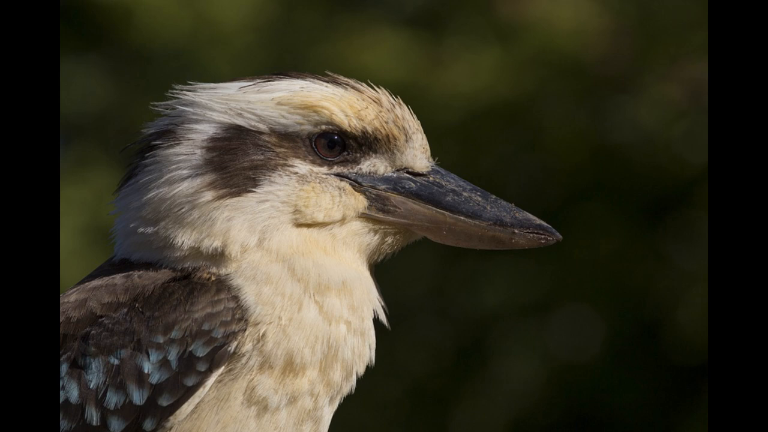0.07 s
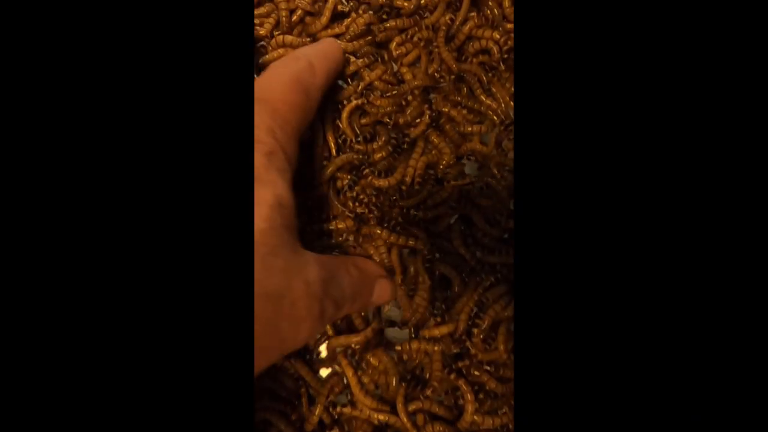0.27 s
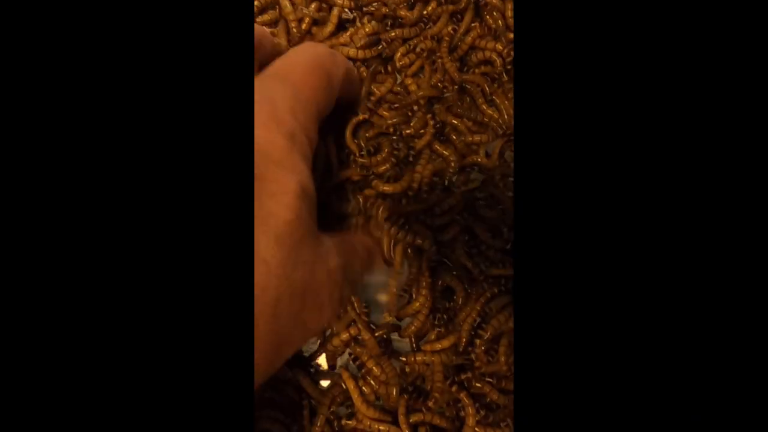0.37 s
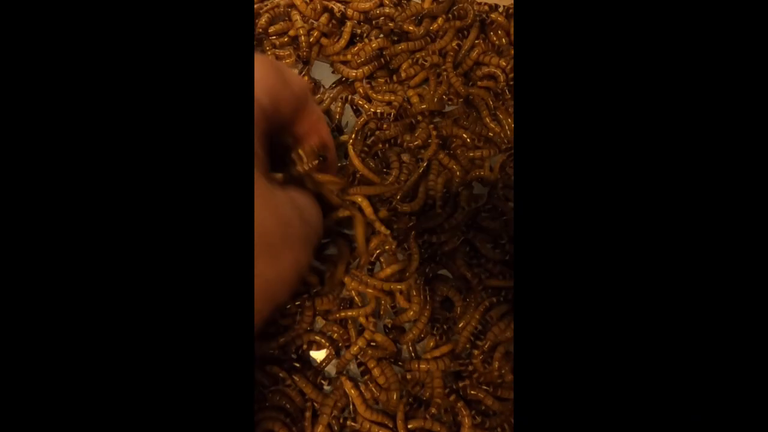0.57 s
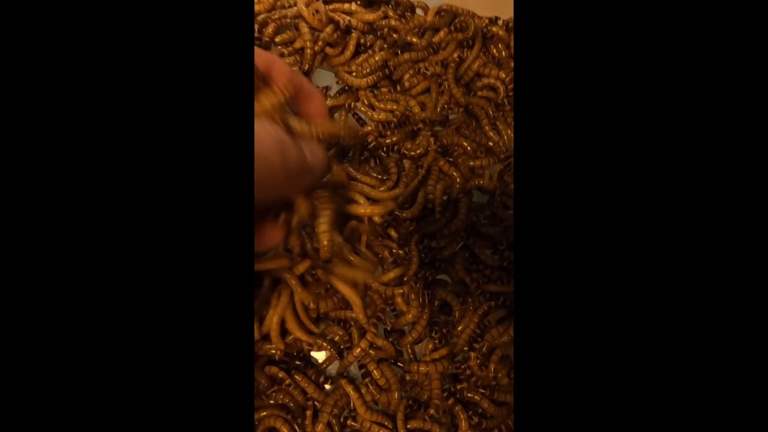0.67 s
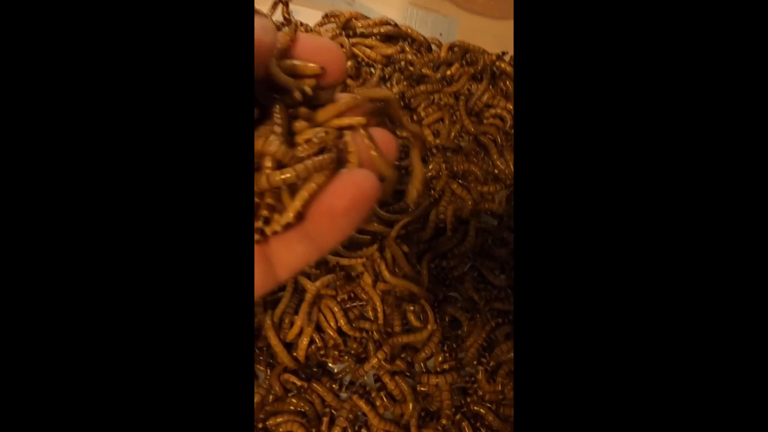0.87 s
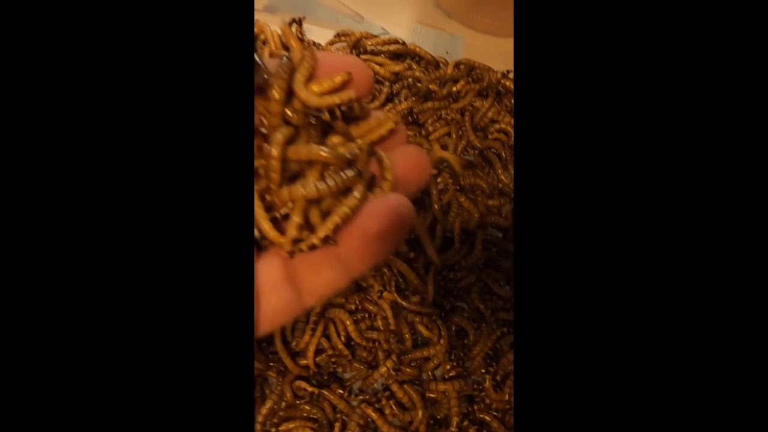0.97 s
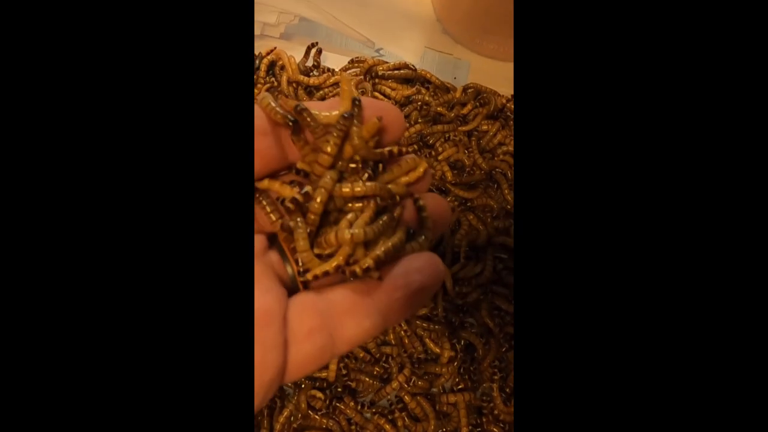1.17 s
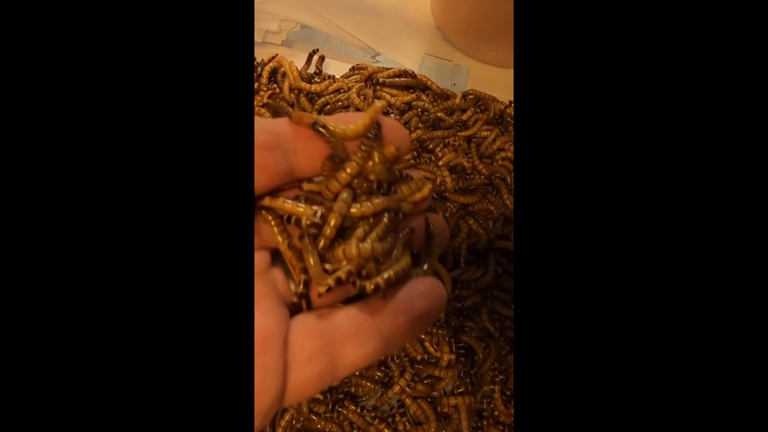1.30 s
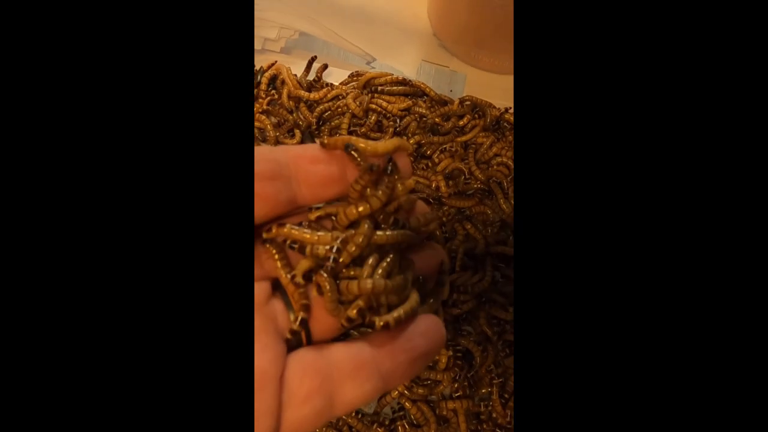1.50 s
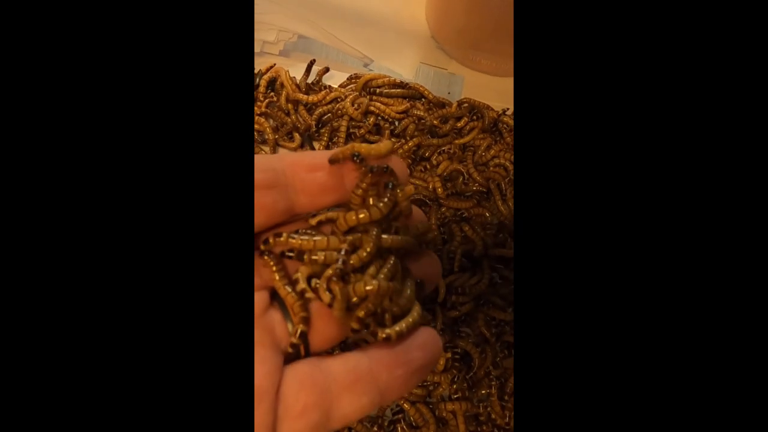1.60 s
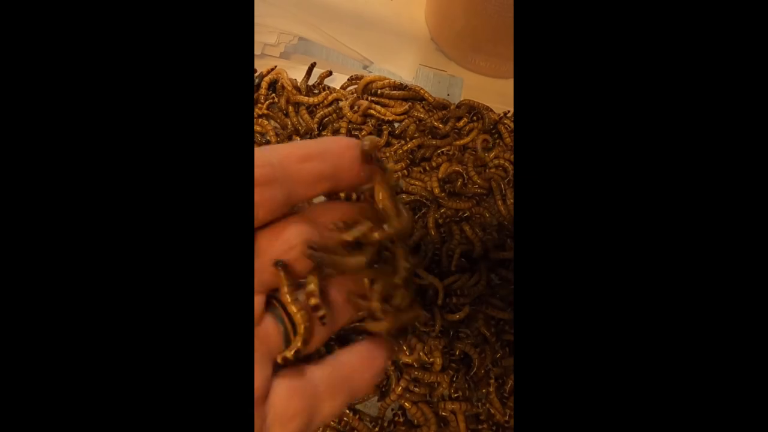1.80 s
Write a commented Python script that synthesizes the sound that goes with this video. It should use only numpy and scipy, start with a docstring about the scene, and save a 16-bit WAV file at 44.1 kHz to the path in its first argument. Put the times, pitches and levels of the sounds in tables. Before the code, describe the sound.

Mealworms rustle dryly as a hand digs into their plastic tub. Knuckles thud on the bottom, a handful trickles back with a soft hiss, and the wall snaps once. The close microphone rumbles over a low room drone.

```python
"""A dry rustle of mealworms as a hand digs into their plastic tub and lets a handful trickle back.
The bodies rub and collide in a mass of tiny clicks. Knuckles knock the loaded bottom, which thuds,
and the wall snaps once. The close hand-held microphone rumbles and is bumped, over a low room drone."""
import sys
import numpy as np
from scipy import signal
from scipy.fft import rfft, irfft, next_fast_len
from scipy.io import wavfile

SR = 44100
rng = np.random.default_rng(int(sys.argv[2]) if len(sys.argv) > 2 else 0)


def pcm_store(signal):
    """Save signal as 16-bit PCM."""
    levels = np.round(np.clip(np.atleast_2d(signal), -1, 1) * 32767)
    wavfile.write(sys.argv[1], SR, levels.astype(np.int16).T)


N = 81585


def amp(db):
    """Decibels to gain."""
    return 10 ** (np.asarray(db) / 20)


def unit(x):
    """Scale to rms 1."""
    return x / np.sqrt(np.mean(x ** 2) + 1e-20)


def along(points, hz):
    """Read a curve of (frequency [Hz], value) points on a log frequency axis."""
    freqs, values = np.transpose(points)
    return np.interp(np.log(hz + 1), np.log(freqs + 1), values)


def fader(rows):
    """A fader ride of (time [s], level [dB]) points as a gain per sample."""
    return amp(np.interp(np.arange(N) / SR, *np.transpose(rows)))


def filtered(x, response):
    """Filter x by a response given as a function of frequency."""
    size = next_fast_len(N + SR // 2)
    return irfft(rfft(x, size) * response(np.fft.rfftfreq(size, 1 / SR)), size)[..., :N]


def colour(x, spectrum, size=8192):
    """Minimum-phase EQ of unit energy: nothing rings ahead of an attack."""
    cepstrum = irfft(np.log(amp(along(spectrum, np.fft.rfftfreq(size, 1 / SR)))))
    cepstrum[1:size // 2] *= 2
    cepstrum[size // 2 + 1:] = 0
    impulse = irfft(np.exp(rfft(cepstrum)))
    return signal.fftconvolve(x, impulse[None] / np.linalg.norm(impulse), axes=1)[:, :N]


def spread(pair):
    """Two unrelated signals as left and right: narrow in the bass and mids, wide in the treble."""
    # likeness of the channels (frequency [Hz], correlation [0-1])
    likeness = [(60, 0.89), (300, 0.93), (1000, 0.96), (2500, 0.69), (6000, 0.55), (12000, 0.22)]
    angle = lambda hz: np.arccos(np.clip(along(likeness, hz), -1, 1)) / 2
    mid, side = filtered(pair, lambda hz: np.array([np.cos(angle(hz)), np.sin(angle(hz))]))
    return np.array([mid + side, mid - side])


def noise(spectrum):
    """Steady coloured stereo noise of rms 1."""
    return unit(spread(colour(rng.standard_normal((2, N)), spectrum)))


def decay(start_s, t60, attack_s):
    """Envelope of a contact: a quick rise and an exponential tail."""
    t = np.maximum(np.arange(N) / SR - start_s, 0)
    return amp(-60 * t / t60) * (1 - np.exp(-t / attack_s))


def bursts(rows, spectrum, attack_s):
    """Rough contacts as noise bursts, from rows of (time [s], level [dB], t60 [s])."""
    envelope = sum(amp(db) * decay(s, t60, attack_s) for s, db, t60 in rows)
    return spread(colour(envelope * rng.choice([-1., 1.], (N, 2)).T, spectrum))


def ring(modes, start_s, attack_s):
    """Damped modes struck together."""
    t = np.arange(N) / SR - start_s
    return sum(amp(db) * decay(start_s, t60, attack_s) * np.sin(2 * np.pi * hz * t)
               for hz, db, t60 in modes)


def grains(spectrum, clicks_per_s=2700, spread_db=5, bed_share=0.41):
    """Dense clicks of uneven size on a bed of finer rubbing, rms about 1."""
    sizes = amp(spread_db * np.minimum(rng.exponential(size=N), np.pi))
    onsets = rng.random(N) < clicks_per_s / SR
    clicks = unit(onsets * sizes * rng.choice([-1., 1.], (2, N)))
    crackle = unit(spread(colour(clicks, spectrum)))
    return np.sqrt(1 - bed_share) * crackle + np.sqrt(bed_share) * noise(spectrum)


def room_drone():
    """A steady bed of low room tone."""
    # drone spectrum (frequency [Hz], level [dB])
    drone_eq = [(30, -25), (105, -27.5), (145, -4.5), (178, 1), (220, -5.5), (280, -2), (340, -12),
                (450, -28), (750, -29), (1300, -24.5), (2500, -38.5), (8000, -41), (12500, -59),
                (15000, -65)]
    return amp(-47.5) * noise(drone_eq)


def room_reverb(x):
    """A small room's tail, each frequency dying at its own speed."""
    # reverb time (frequency [Hz], t60 [s])
    decay_times = [(150, 0.16), (1500, 0.38), (5000, 0.25), (12000, 0.21)]
    hz, t, bands = signal.stft(rng.standard_normal((2, SR // 2)), SR, nperseg=256)
    fade = amp(-60 * t / along(decay_times, hz)[:, None])
    tail = signal.istft(bands * fade, SR, nperseg=256)[1]
    return signal.fftconvolve(x, tail / np.linalg.norm(tail[0]), axes=1)[:, :N]


def microphone_handling():
    """The grip rumbles and flexes, skin rubs on plastic and soft bumps ring the housing."""
    # grip rumble, and the sub-bass of its slow flexing (time [s], level [dB])
    rumble_ride = [(.16, -30), (.21, -37), (.28, -56.5), (.37, -39), (.48, -42), (.58, -40), (.62, -35.5),
                   (.70, -36.5), (.78, -51), (1.0, -56), (1.11, -55), (1.155, -30), (1.23, -42),
                   (1.29, -56), (1.39, -42.5), (1.47, -85), (1.85, -71)]
    flex_ride = [(.16, -59), (.30, -50), (.39, -38), (.55, -47), (.68, -30), (.79, -50), (1.0, -72),
                 (1.16, -39), (1.29, -60), (1.38, -44), (1.48, -60), (1.56, -44.5), (1.63, -46),
                 (1.70, -61), (1.85, -60)]
    # their spectra, and that of rubbing skin (frequency [Hz], level [dB])
    rumble_eq = [(12, -31), (28, 0), (50, -15.5), (90, -8.5), (130, -15), (250, -21.5), (450, -41),
                 (1200, -78.5)]
    flex_eq = [(10, -13), (20, -6.5), (30, 1), (45, -9.5), (65, -23.5), (150, -55), (400, -93)]
    rub_eq = [(120, -14), (300, 0), (480, -5), (620, -0.5), (750, 2.5), (850, -8.5), (950, -0.5),
              (1150, -13.5), (1500, -19.5), (3000, -23), (8000, -58), (15000, -59)]
    # skin rubs (time [s], level [dB], t60 [s])
    rub_cues = [(.767, -33.5, 0.057), (1.055, -43, 0.081), (1.120, -35, 0.18), (1.378, -50.5, 0.038)]
    # housing resonances (frequency [Hz], level [dB], t60 [s])
    housing_modes = [(136, -11, 0.089), (229.3, -3, 0.094), (258, 9, 0.049), (288, -26, 0.067)]
    # bumps on the housing (time [s], level [dB])
    bump_cues = [(1.1217, -23.5), (1.13, -17), (1.162, -27), (1.194, -30.5)]
    grip = fader(rumble_ride) * noise(rumble_eq) + fader(flex_ride) * noise(flex_eq)
    bumps = sum(amp(db) * ring(housing_modes, s, attack_s=0.0084) for s, db in bump_cues)
    return grip + bumps + bursts(rub_cues, rub_eq, attack_s=0.0034)


def finger_scrapes():
    """Fingers scrape the tub wall in two short, resonant rasps."""
    # scrapes (time [s], level [dB], t60 [s])
    scrape_cues = [(.372, -30, 0.05), (.387, -37, 0.12)]
    # rasp spectrum (frequency [Hz], level [dB])
    scrape_eq = [(300, -35), (900, -15), (1400, 5.5), (1800, -4), (2150, 6.5), (2700, -8), (3600, -3),
                 (6000, -21), (12000, -50)]
    return bursts(scrape_cues, scrape_eq, attack_s=0.00061)


def tub_knocks():
    """Knuckles rap the plastic, and the loaded bottom gives a low thud."""
    # knuckle hits, and a few dull ticks of the same kind (time [s], level [dB], t60 [s])
    knock_cues = [(.5912, -19, .028), (.619, -32.5, 0.028), (.641, -38, 0.042), (.682, -39, 0.022),
                  (.702, -38, 0.031), (1.095, -42, .025), (1.657, -44, 0.028)]
    # spectrum of a hit (frequency [Hz], level [dB])
    knock_eq = [(150, -5), (500, -16.5), (750, 1.5), (1000, 1), (1400, -9), (2200, -12), (3000, -24.5),
                (8000, -36.5), (15000, -70)]
    # resonances of the bottom (frequency [Hz], level [dB], t60 [s])
    bottom_modes = [(88.2, -0.5, 0.29), (146.4, 0, 0.13), (176, -3.5, 0.11), (274, -0.5, 0.056)]
    # thuds of the bottom (time [s], level [dB])
    thud_cues = [(0.594, -20.5), (0.6214, -31.5), (.656, -35.5), (.768, -40.5), (1.055, -47)]
    thuds = sum(amp(db) * ring(bottom_modes, s, attack_s=0.0013) for s, db in thud_cues)
    return bursts(knock_cues, knock_eq, attack_s=0.00042) + thuds


def wall_snap(start_s=1.5338, crack_db=-24.5, crack_t60_s=0.021):
    """The tub wall snaps as the hand lifts away: a bright crack and a short plastic ring."""
    # wall resonances (frequency [Hz], level [dB], t60 [s])
    wall_modes = [(202, -6, 0.085), (308, -8, 0.044), (730, -1.5, 0.045), (1238, 4, 0.031),
                  (1543, -6.5, 0.039), (2002, -5, 0.04), (2580, -28, .018), (2640, -12, .012),
                  (2880, -14, 0.015), (3710, -10, 0.028), (4860, -8.5, 0.023), (5440, -8, 0.024),
                  (6500, -19, .018), (7830, -14, 0.016)]
    # crack spectrum (frequency [Hz], level [dB])
    crack_eq = [(200, -20), (600, -4.5), (1200, -9), (2700, 4.5), (4000, -5), (7800, -5), (10500, -16.5),
                (12200, -19), (14000, -34), (16000, -76)]
    crack = bursts([(start_s, crack_db, crack_t60_s)], crack_eq, attack_s=0.0001)
    return crack + amp(-27.5) * ring(wall_modes, start_s, attack_s=0.00065)


def worms(tick_t60_s=0.012):
    """Pressed bodies rustle, loose ones hiss, a few tick singly on the tub and on each other."""
    # rustle of digging, and hiss of worms sliding off the hand (time [s], level [dB])
    dig_ride = [(.16, -51.5), (.30, -57), (.36, -43.5), (.385, -44), (.43, -44.5), (.485, -45.5),
                (.515, -37.5), (.58, -39), (.63, -43), (.70, -51), (.80, -52.5), (.95, -56.5), (1.07, -55),
                (1.25, -59.5), (1.85, -74)]
    slide_ride = [(.16, -59), (.33, -58.5), (.40, -57), (.47, -57), (.54, -58), (.63, -57), (.75, -63.5),
                  (.82, -50.5), (.91, -61.5), (1.05, -66), (1.2, -73), (1.5, -68.5), (1.57, -65),
                  (1.85, -69.5)]
    # single ticks (time [s], level [dB])
    tick_cues = [(.2585, -40), (.279, -34), (.2965, -43), (.3095, -46), (.387, -31), (.5135, -38),
                 (.551, -37), (.5652, -30), (.6588, -33), (.7035, -42), (.868, -46), (1.047, -39),
                 (1.050, -43), (1.073, -44), (1.0958, -44), (1.110, -47), (1.119, -48), (1.3815, -44),
                 (1.8285, -54)]
    # spectra of the three layers (frequency [Hz], level [dB])
    rustle_eq = [(120, -8), (300, 6.5), (600, -1.5), (1000, -0.5), (2200, -7.5), (4000, -12.5),
                 (8000, -22.5), (11000, -30), (15500, -46)]
    hiss_eq = [(500, -25), (1500, -4), (3500, -0.5), (5500, -5.5), (8000, -8.5), (10500, -13), (13000, -26),
               (15500, -36)]
    tick_eq = [(200, -27), (700, -0.5), (1500, 1.5), (3000, 0), (5000, -5), (8500, -9.5), (12000, -33),
               (15500, -40)]
    ticks = bursts([(s, db, tick_t60_s) for s, db in tick_cues], tick_eq, attack_s=0.00022)
    return fader(dig_ride) * grains(rustle_eq) + fader(slide_ride) * grains(hiss_eq) + ticks


def scene(left_lag_s=0.000022):
    """The tub in a droning room, the whole mix panned a little to the right."""
    # stereo balance (frequency [Hz], left over right [dB])
    balance = [(40, -1.5), (250, -3.5), (700, -3), (1500, -1), (2800, 0.3), (5000, -5.5), (12000, -5)]
    tub = worms() + finger_scrapes() + tub_knocks() + wall_snap()
    mix = tub + amp(-12.5) * room_reverb(tub) + microphone_handling() + room_drone()
    sides = np.array([[.5], [-.5]])  # each channel takes half of the pan and lag
    pan = lambda hz: amp(sides * along(balance, hz))
    lag = lambda hz: np.exp(-2j * np.pi * hz * sides * left_lag_s)
    return filtered(mix, lambda hz: pan(hz) * lag(hz))


def record(dry, start_s=0.161, fade_in_s=0.002, cutoff_hz=15800):
    """The sound fades in over a moment, cuts out four times for an instant, and the top is rolled off."""
    # dropouts (start [s], end [s])
    dropouts = [(.1805, .184), (.2054, .2077), (.229, .231), (.508, .5097)]
    t = np.arange(N) / SR
    muted = sum((t >= start) & (t < end) for start, end in dropouts)
    fade_in = np.clip((t - start_s) / fade_in_s, 0, 1)
    return filtered(dry * fade_in * (muted == 0), lambda hz: hz < cutoff_hz)


dry = scene()
out = record(dry)
pcm_store(out)
```